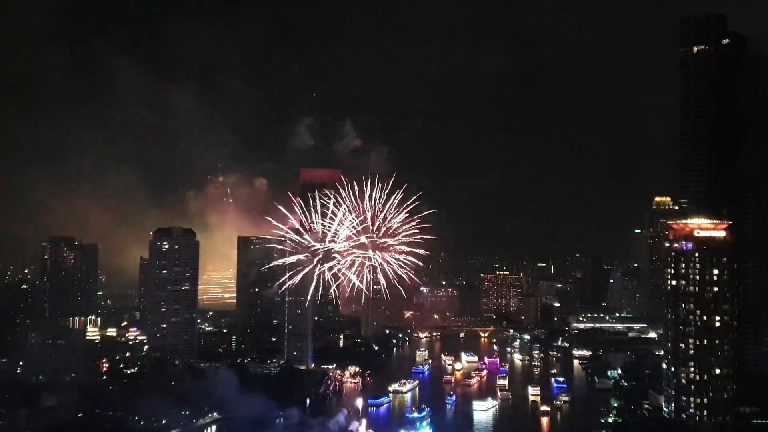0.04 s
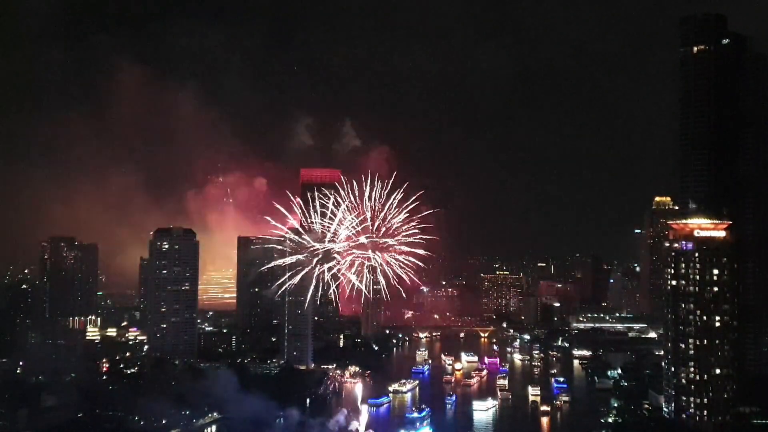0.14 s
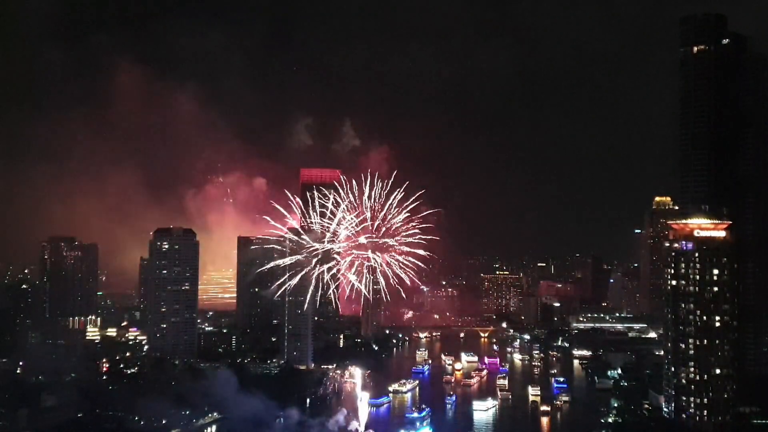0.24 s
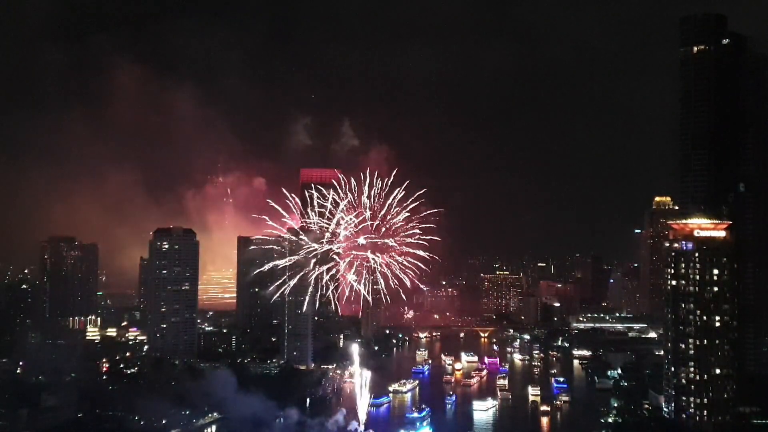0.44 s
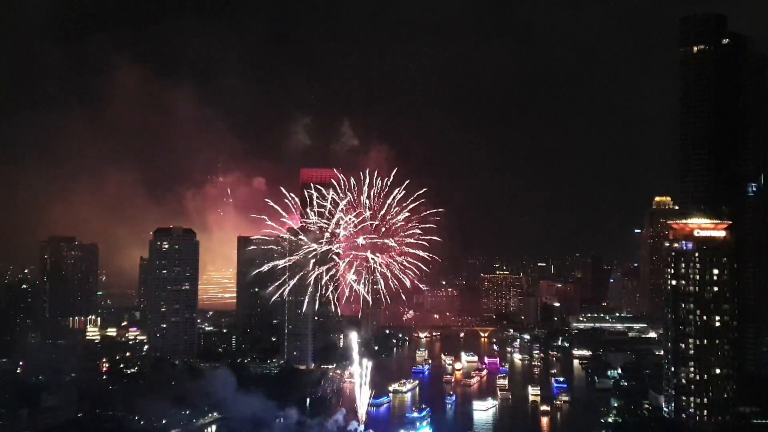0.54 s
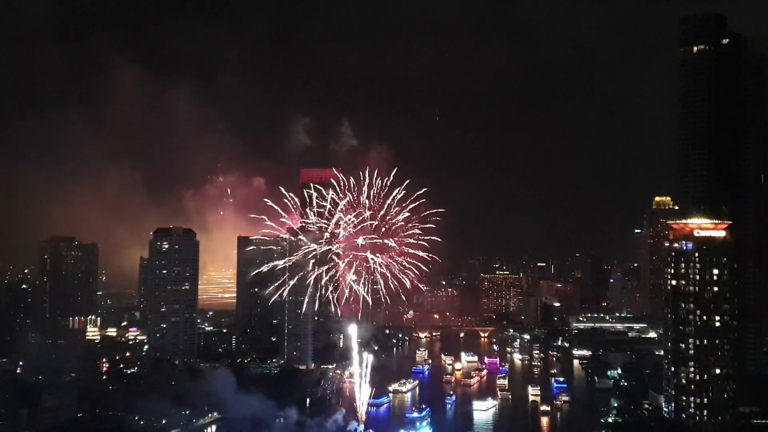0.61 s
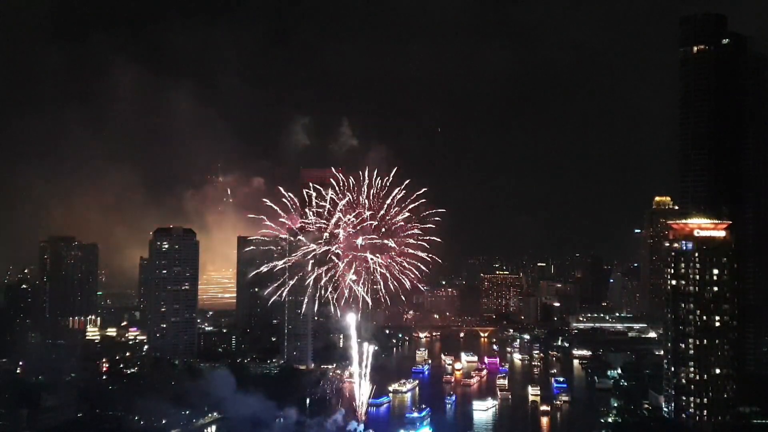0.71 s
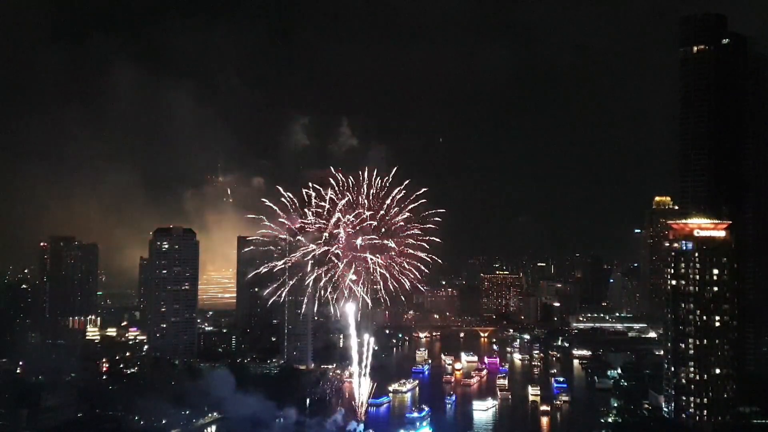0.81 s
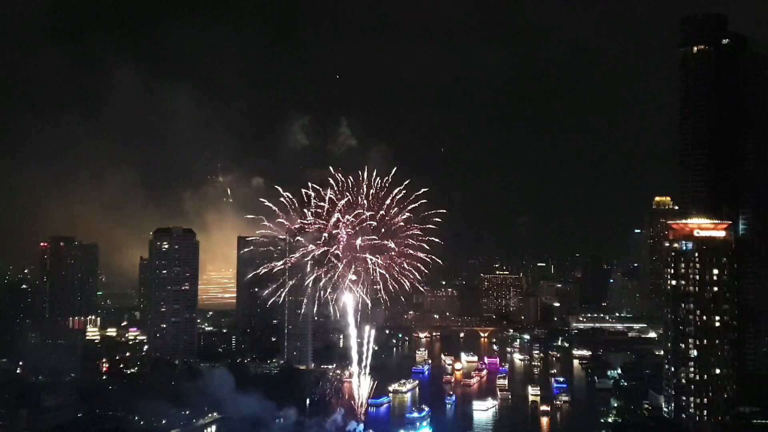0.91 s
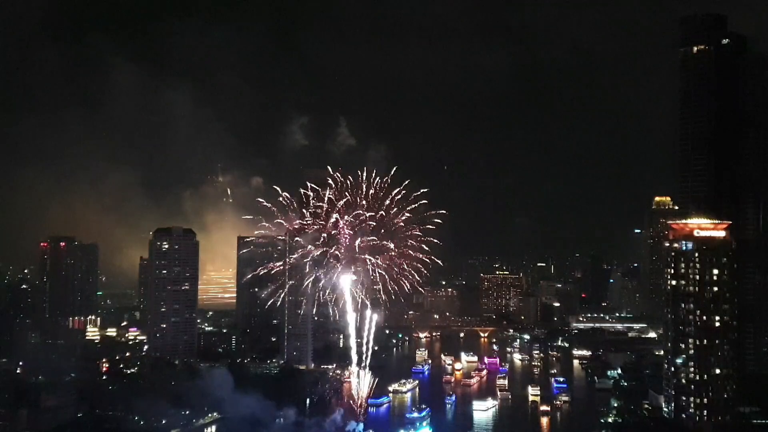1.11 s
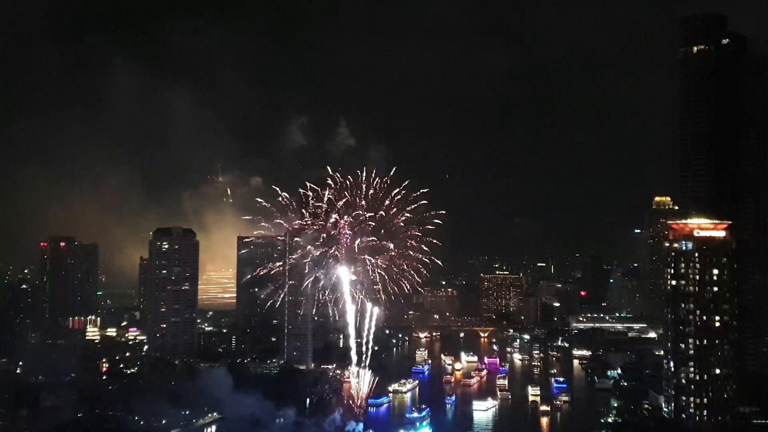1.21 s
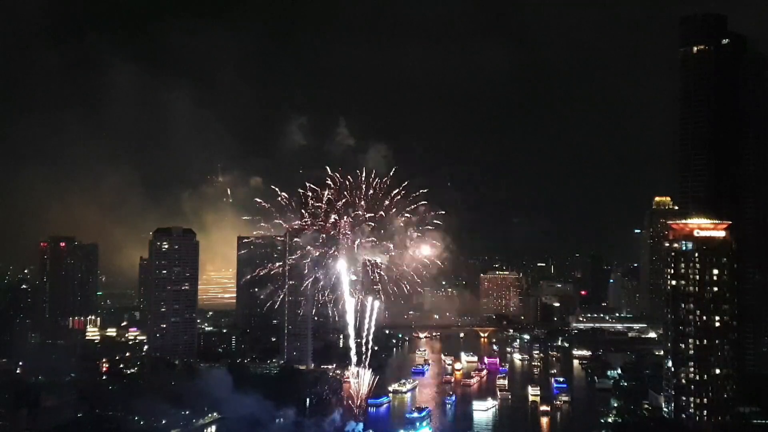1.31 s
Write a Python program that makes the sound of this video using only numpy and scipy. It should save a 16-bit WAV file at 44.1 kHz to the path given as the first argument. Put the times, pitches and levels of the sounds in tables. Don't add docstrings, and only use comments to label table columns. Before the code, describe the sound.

Distant fireworks boom in a rapid overlapping cluster over a night city, then fade into rolling rumble.

```python
import sys
import numpy as np
from scipy import signal
from scipy.fft import rfft, irfft
from scipy.io import wavfile
from scipy.ndimage import uniform_filter1d

SR = 44100
rng = np.random.default_rng(int(sys.argv[2]) if len(sys.argv) > 2 else 0)


def gain_from_decibels(decibels):
    exponent = np.asarray(decibels, float) / 20
    return 10 ** exponent


def wrap_up_sound(samples):
    columns = np.atleast_2d(samples).T
    tamed = np.clip(columns, -1, 1)
    steps = np.round(tamed * 32767).astype(np.int16)
    wavfile.write(sys.argv[1], SR, steps)


N = 59535


def read_table(rows, hz):
    rows = np.array(rows)
    return [np.interp(np.log(hz), np.log(rows[:, 0]), column) for column in rows[:, 1:].T]


def walk(rate):
    hold = int(SR / rate)
    steps = np.repeat(rng.standard_normal(N // hold + 1), hold)[:N]
    return 0.48 * uniform_filter1d(uniform_filter1d(steps, hold), hold)


def band(hz, octaves, channels):
    f = np.maximum(np.arange(N // 2 + 1) * SR / N, 1)
    shape = np.exp(-(np.log2(f / hz) / octaves) ** 2)
    return irfft(rfft(rng.standard_normal((channels, N))) * shape, N)


# thump time in seconds,
# thump peak in dB, thump pitch in Hz, scattered wash in dB, wash brightness in dB per octave.
BURSTS = [(0.042, -45, 60, -23.5, 1.5), (0.093, -31.5, 61.5, -23.5, 1.5), (0.216, -11, 96.5, -3, 3.5),
          (0.316, -21.5, 84.6, -25, -5.5), (0.3731, -12, 92, -10, 5), (.387, -14, 64.5, -9, -8.5),
          (0.4562, -11.5, 90.3, -2.5, 1), (0.517, -42.5, 60, -10, 4.5), (0.5533, -6, 80, 1, 0.5),
          (0.561, -33.5, 91.3, -4, 3.5), (0.634, -33.5, 121, -16, 4), (0.7198, -10, 90.5, -2, 3),
          (0.7328, -9.5, 58.8, 1.5, 0.5), (0.775, -28.5, 70.08, -15.5, 1), (0.829, -23.5, 92.4, -20, -6.5),
          (0.873, -13.5, 110, -8.5, 3), (0.902, -19, 92.6, -4.5, 0), (0.929, -17, 105.3, -21, -12),
          (0.982, -16.5, 78, -19.5, 6.5), (1.027, -46, 89, -21.5, -7), (1.057, -20, 60, -23, -10.5),
          (1.141, -33, 75, -27.5, -3), (1.194, -31, 82, -31.5, 0), (1.251, -25.5, 110, -28, -1.5),
          (1.3256, -30, 81, -27.5, -2)]
# frequency in Hz, level in dB per Hz.
WASH = [(36, -5.5), (50, -3), (120, -2), (290, -19.5), (360, -22.5), (490, -29), (650, -29.5),
        (1300, -38.5)]
# frequency in Hz, level in dB.
WASH_HIGH = [(1300, 2), (2500, -8.5), (3600, -19), (8000, -29.5)]
# frequency in Hz, quick t60 in seconds, slow t60 in seconds.
RING = [(60, 0.53, 2.11), (400, 0.3, 2.18), (750, 0.37, 3.55), (2070, 0.33, 3.64), (6100, 0.21, 1.2)]


def wash():
    t = np.arange(N) / SR
    wash_db, slow_db = -25, -9.5
    earlier_db, earlier_bright, earlier_bass_db = -16.5, -0.45, -3.5
    cover_db, cover_hz = -15, 200
    lead_s, attack_s = 0.0105, 0.003
    treble_attack_s, treble_hz = 0.007, 4300
    bright_from_hz, bright_to_hz = 700, 3500
    ports_m, bass_alike = 0.16, 0.98
    patches_db = 1.3 * walk(45)
    lumps_db = 3 * walk(22)
    around = np.linspace(0, np.pi, 64)
    out = 0
    for hz in 35 * 2 ** np.arange(0, 7.9, 1 / 4):
        quick, slow = read_table(RING, hz)
        bass = 1 / (1 + (hz / cover_hz) ** 4)
        cover = gain_from_decibels(2 * cover_db * bass)
        octaves = np.log2(np.clip(hz, bright_from_hz, bright_to_hz) / bright_from_hz)
        attack = attack_s + treble_attack_s / (1 + (treble_hz / hz) ** 6)

        old_db = earlier_db + earlier_bright * octaves + earlier_bass_db * (hz < 420)
        power = gain_from_decibels(2 * old_db) * 1e-6 ** (t / slow)
        for start, _, _, db, bright in BURSTS:
            age = np.maximum(t - start + lead_s, 0)
            fade = cover * 1e-6 ** (age / quick) + gain_from_decibels(2 * slow_db) * 1e-6 ** (age / slow)
            rise = (1 - np.exp(-age / attack)) ** 2
            power = power + gain_from_decibels(2 * (db + bright * octaves)) * rise * fade

        alike = bass_alike * np.mean(np.cos(2 * np.pi * hz * ports_m / 343 * np.sin(around)))
        mid, side = band(hz, 0.15, channels=2)
        pair = np.sqrt(1 + alike) * mid + np.sqrt(1 - alike) * side * np.array([[1], [-1]])

        flicker_db = 1.0 * walk(70)
        db = read_table(WASH, hz)[0] + read_table(WASH_HIGH, hz)[0] + lumps_db * bass
        out = out + gain_from_decibels(db + patches_db + flicker_db) * np.sqrt(power) * pair
    return out * gain_from_decibels(wash_db) / np.std(out)


# frequency in Hz, level in dB per Hz.
HISS = [(2000, -14.5), (3500, -4), (5000, -4), (7500, -2.5), (8800, -9), (9900, -18.5), (10600, -24)]


def hiss():
    f = np.maximum(np.arange(N // 2 + 1) * SR / N, 1)
    shape = gain_from_decibels(read_table(HISS, f)[0]) * np.minimum(f / 2000, 1) ** 2
    x = irfft(rfft(rng.standard_normal((2, N))) * shape, N)
    return x * gain_from_decibels(-65.5) / np.std(x)


# delay in seconds, level in dB, ratio to the thump pitch, lag of the left port in seconds.
ARRIVALS = [
    (-.0078, -5.5, 1.5, -.0006),
    (0, 0, 1.1, -.0004),
    (.008, -8, 1.45, .0004),
    (.0174, 3, 1.1, -.0003),
    (.0312, -4.5, 1.25, -.0006),
    (.040, -8, 1.3, .0004),
    (.059, -8, .8, -.0005),
]


def thumps():
    swing_cycles = 0.39
    tip_db, tip_ratio = -21.5, 3.55
    front_lean = 1.3
    t = np.arange(N + SR) / SR
    out = np.zeros((2, N + SR))
    for start, db, hz, _, _ in BURSTS:
        for delay, arrival_db, ratio, lag in ARRIVALS:
            lean = front_lean * (delay < 0)
            first = max(int((start + delay) * SR) - 1500, 0)
            here = slice(first, first + 3000)
            port_lag = np.array([[lag / 2], [-lag / 2]])
            cycles = hz * ratio * (t[here] - start - delay - port_lag)
            swing = np.cos(2 * np.pi * cycles + lean) * np.exp(-(cycles / swing_cycles) ** 2)
            u = np.pi * (cycles + lean / 8) * tip_ratio
            tip = (1 - 2 * u ** 2) * np.exp(-u ** 2)
            out[:, here] += gain_from_decibels(db + arrival_db) * (swing + gain_from_decibels(tip_db) * tip)
    return out[:, :N]


# frequency in Hz, level in dB under the thump, t60 in seconds.
RECESS = [(73.5, -14, 0.2), (353.2, -19.5, 0.072), (415, -22.5, 0.063), (606, -29, 0.42),
          (689.2, -35, 0.23), (771.3, -41.5, 0.12), (1548, -39.5, .15)]


def recess():
    t = np.arange(SR // 3) / SR
    kicks = np.zeros((2, N + SR))
    for start, db, *_ in BURSTS:
        for delay, arrival_db, _, lag in ARRIVALS:
            left = int((start + delay + lag / 2) * SR)
            right = int((start + delay - lag / 2) * SR)
            kicks[[0, 1], [left, right]] += gain_from_decibels(db + arrival_db + 2 * rng.standard_normal())
    ring = 0
    for hz, db, t60 in RECESS:
        build = 1 - np.exp(-t * hz)
        ring = ring + gain_from_decibels(db) * np.sin(2 * np.pi * hz * t) * 1e-3 ** (t / t60) * build
    return signal.fftconvolve(kicks, ring[None], axes=1)[:, :N]


# start in seconds, level in dB, centre in Hz, t60 in seconds.
CRACKS = [(.2045, -41.5, 1950, 0.12), (.367, -48.5, 2000, 0.19), (.453, -51, 2800, .15),
          (.548, -45.5, 1700, 0.12), (.728, -45.5, 2300, 0.11), (.4495, -58.5, 5700, .05),
          (.5555, -54.5, 5400, .07), (.455, -40, 720, .25), (.567, -36.5, 740, 0.49),
          (.7165, -42.5, 1500, .12), (.366, -38.5, 330, .15)]


def cracks():
    t = np.arange(N) / SR
    out = 0
    for start, db, hz, t60 in CRACKS:
        grain = band(hz, 0.45, channels=2) * gain_from_decibels(2.5 * walk(300))
        fade = (t > start) * 1e-3 ** (np.maximum(t - start, 0) / t60)
        out = out + gain_from_decibels(db) * grain / np.std(grain) * fade
    return out


# start in seconds, peak in dB.
RATTLES = [
    (.2095, -40.5),
    (.450, -47.5),
    (0.558, -41.5),
]
# frequency in Hz, level in dB, t60 in seconds.
FITTING = [(3800, -13.5, 0.037), (5120, -10, 0.044), (5600, -1.5, 0.012), (6720, -14, 0.014),
           (7180, -13, 0.02)]


def rattle():
    t = np.arange(N) / SR
    out = np.zeros((2, N))
    for start, db in RATTLES:
        age = np.maximum(t - start, 0)
        for hz, mode_db, t60 in FITTING:
            turn = rng.random((2, 1))
            ring = np.sin(2 * np.pi * (hz * age + turn)) * np.minimum(age / 0.00082, 1)
            out += gain_from_decibels(db + mode_db) * 1e-3 ** (age / t60) * ring
    return out


def scene():
    return wash() + hiss() + thumps() + recess() + cracks() + rattle()


def band_limit(x):
    return signal.sosfilt(signal.butter(12, 11000, fs=SR, output="sos"), x)


def record(dry):
    ceiling = 1.1
    low_cut = signal.butter(3, 39, "high", fs=SR, output="sos")
    x = signal.sosfiltfilt(low_cut, dry, padtype="even")
    rounded = ceiling * np.tanh(x / ceiling)
    mix = rounded * gain_from_decibels([[-0.3], [0.3]])
    return band_limit(mix)


dry = scene()
out = record(dry)
wrap_up_sound(out)
```